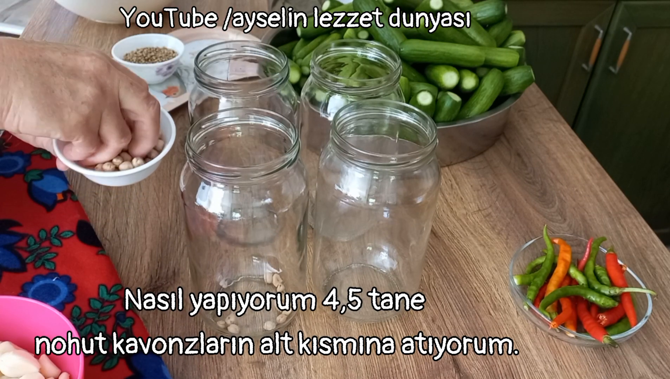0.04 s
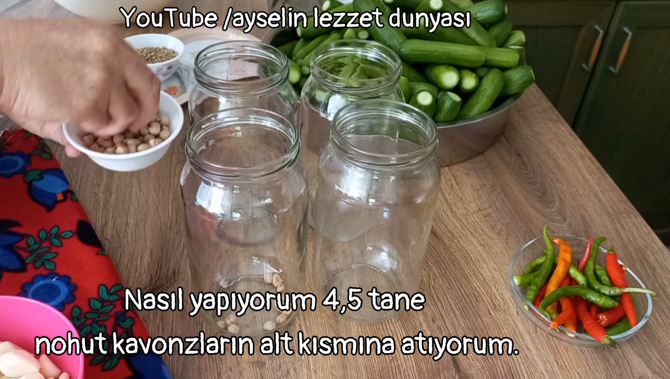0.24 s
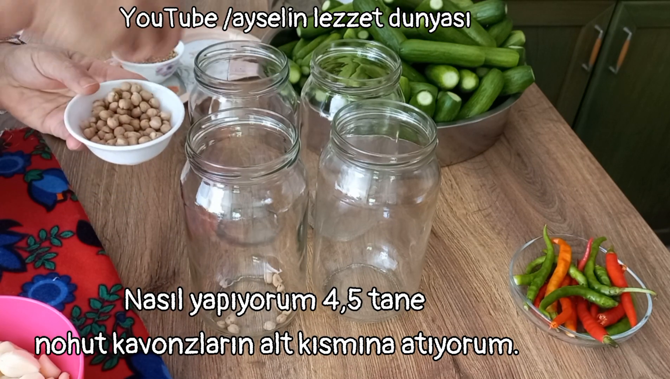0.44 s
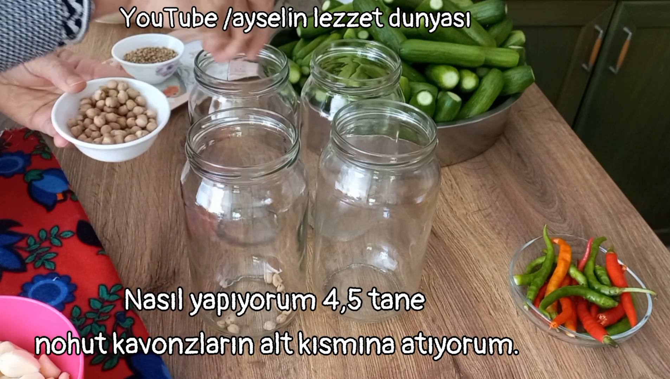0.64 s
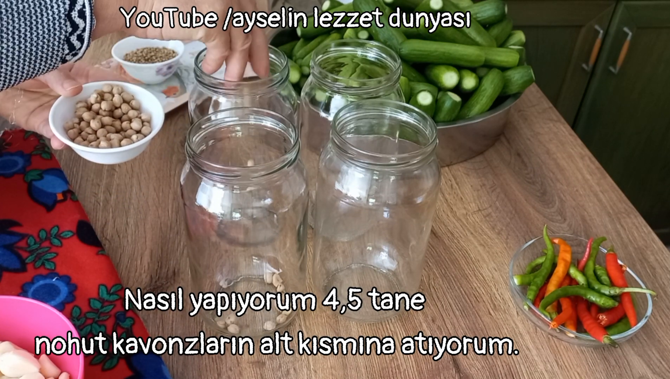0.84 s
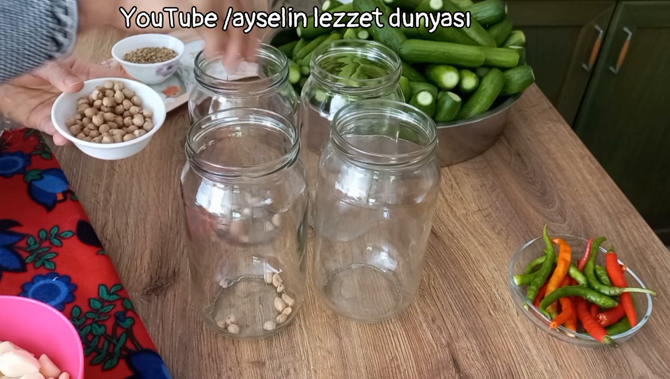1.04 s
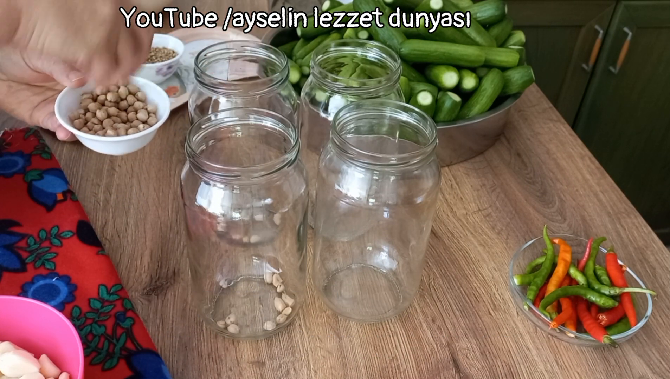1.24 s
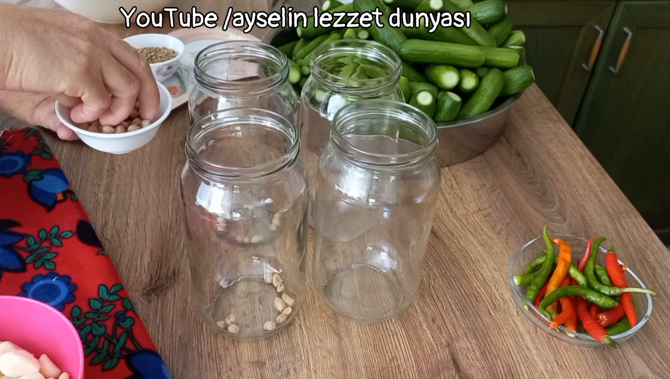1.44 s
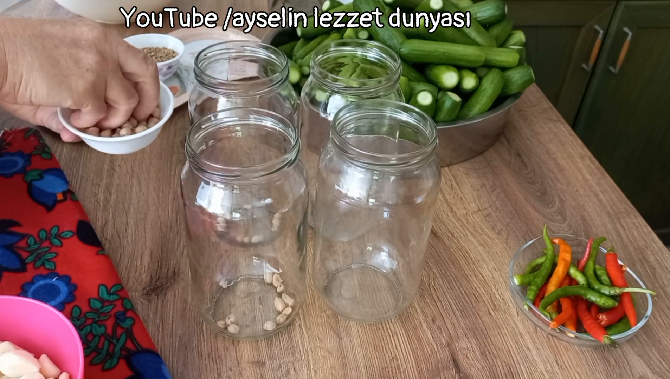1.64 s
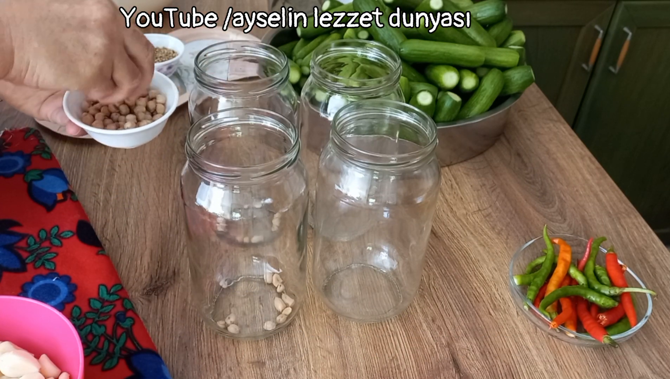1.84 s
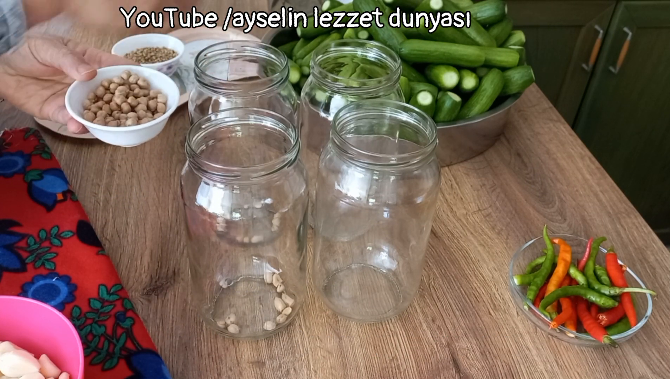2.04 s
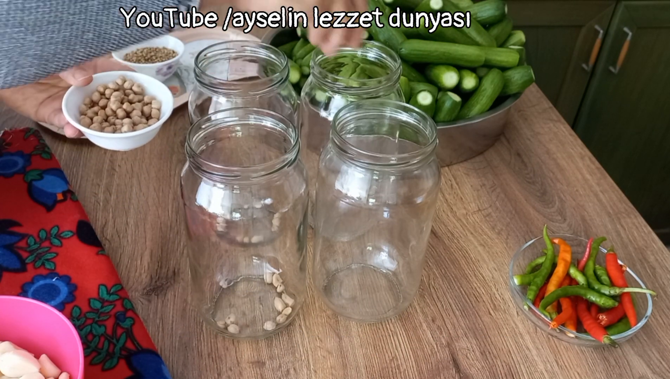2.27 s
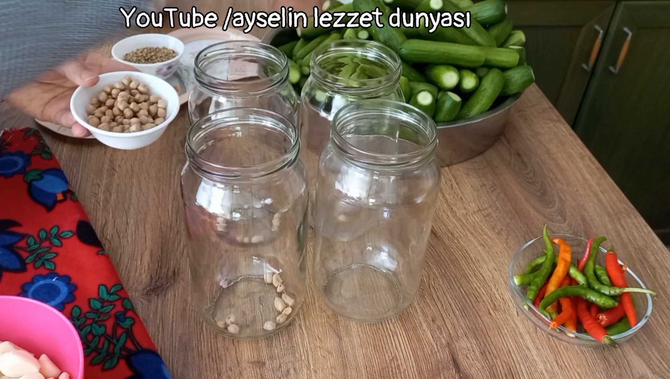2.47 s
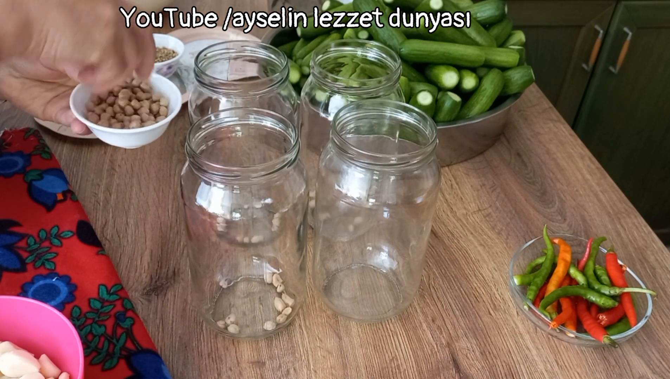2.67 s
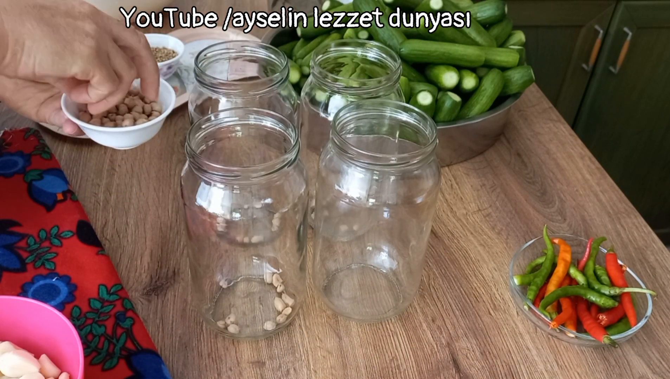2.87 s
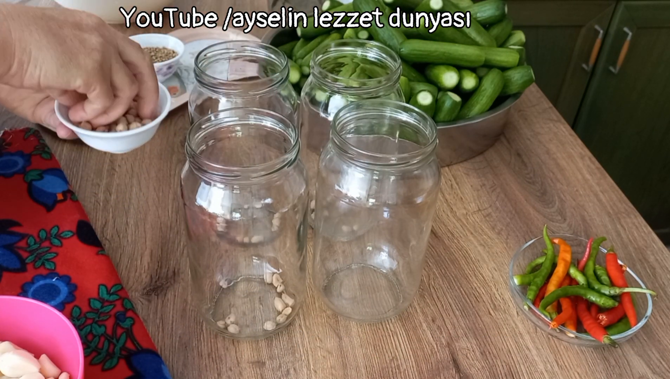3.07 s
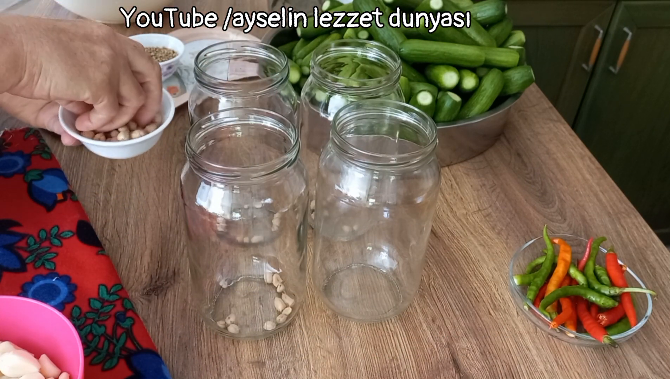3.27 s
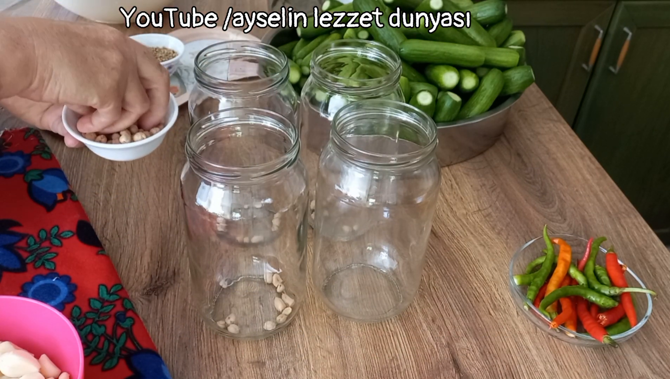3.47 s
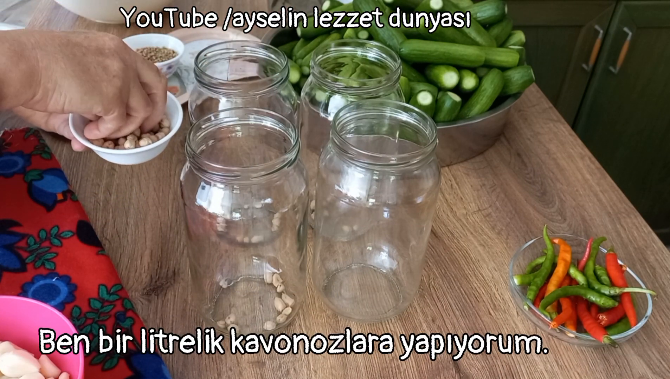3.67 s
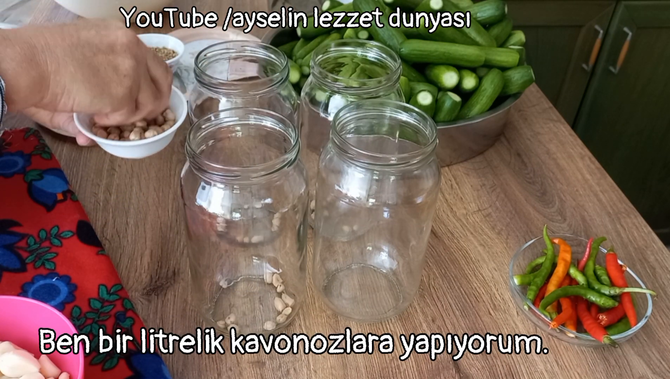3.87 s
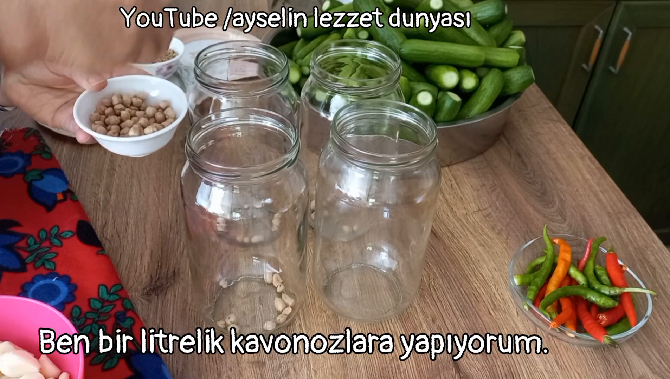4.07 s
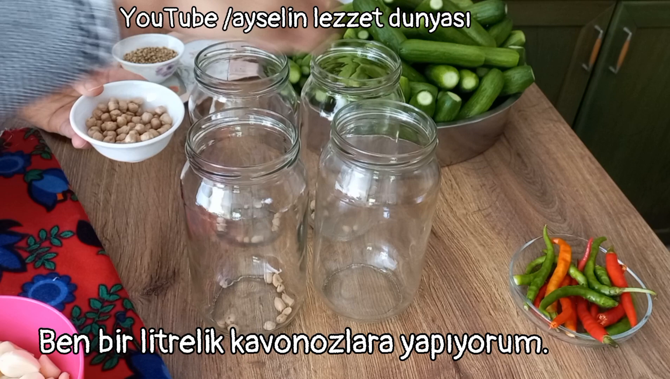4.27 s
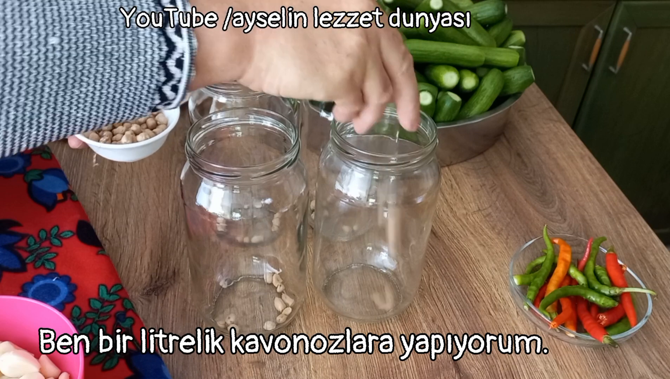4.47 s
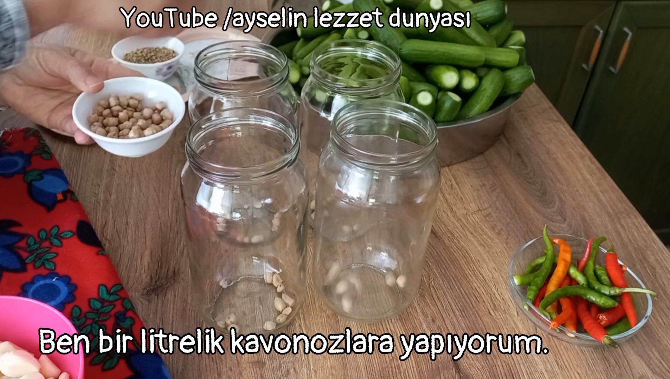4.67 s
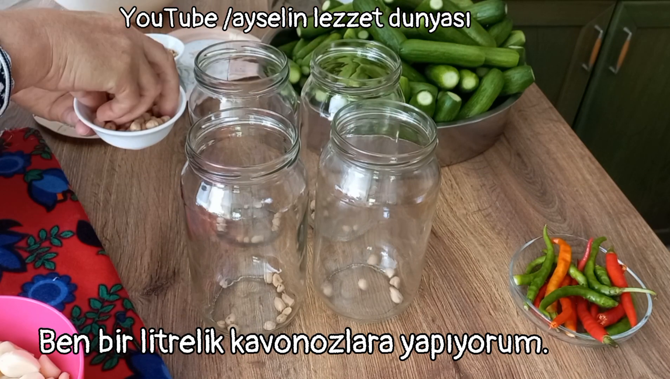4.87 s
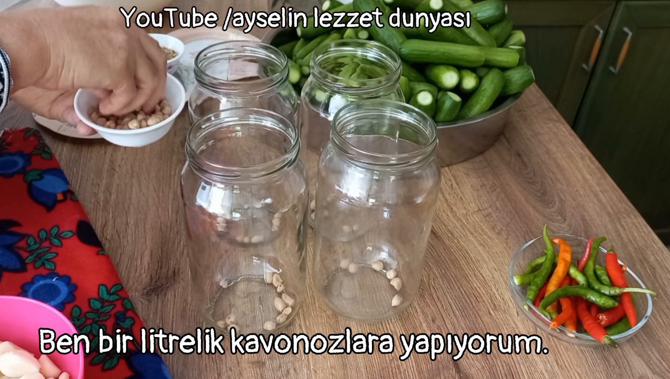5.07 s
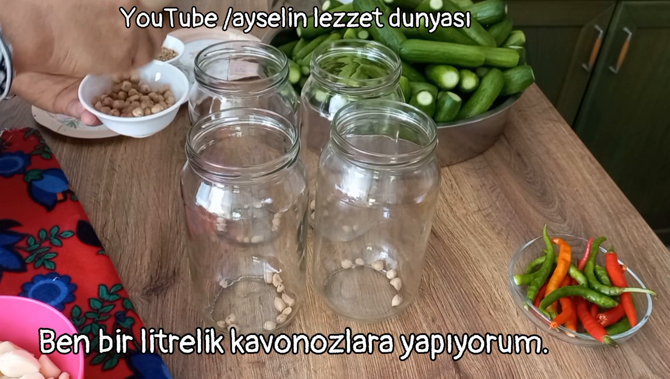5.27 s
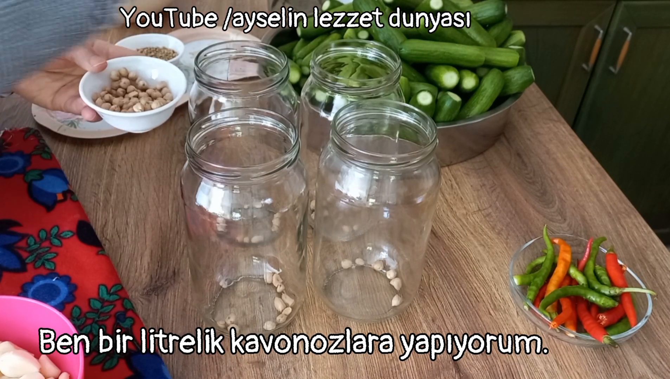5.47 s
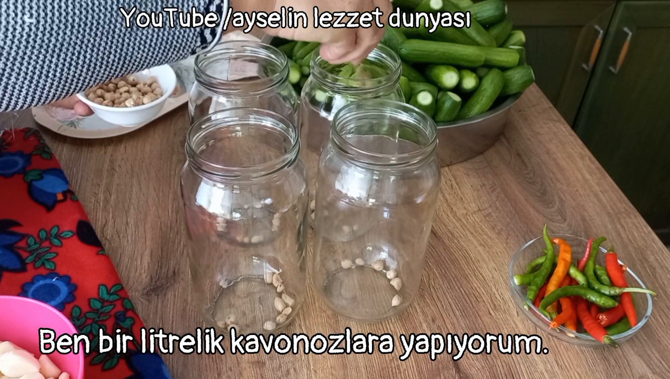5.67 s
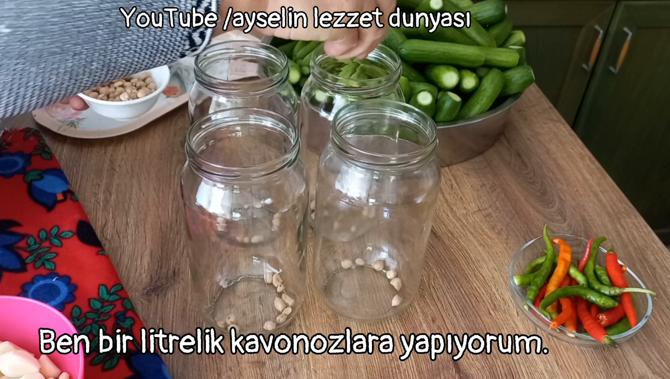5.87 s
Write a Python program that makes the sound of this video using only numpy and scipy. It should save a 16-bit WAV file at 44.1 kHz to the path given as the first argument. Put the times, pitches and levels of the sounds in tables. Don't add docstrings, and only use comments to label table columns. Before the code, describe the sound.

Close stereo microphones in a quiet kitchen. Fingers stir dried chickpeas in a damped porcelain bowl with short dry knocks, then drop them into empty glass jars: four quick bursts of bright, ringing clinks with a small hollow boom, each trailing into lighter bounces and rolling. Sparrows chirp outside the window with a slight wall echo. Low room and street hum and soft sleeve rustle lie underneath.

```python
import sys
import numpy as np
from scipy import signal
from scipy.io import wavfile

SR = 44100
rng = np.random.default_rng(int(sys.argv[2]) if len(sys.argv) > 2 else 0)


def nominal_scale(level):
    x = np.asarray(level, float) / 20
    return 10 ** x


def log_audio(samples):
    frames = np.atleast_2d(samples).T
    limited = np.clip(frames, -1, 1)
    pcm = np.round(limited * 32767).astype(np.int16)
    wavfile.write(sys.argv[1], SR, pcm)


N = 260631
T = np.arange(N) / SR


def rms_one(x):
    return x / np.sqrt(np.mean(x ** 2) + 1e-20)


def at_hz(points, hz):
    points_hz, values = np.transpose(points)
    return np.interp(np.log(hz), np.log(points_hz), values)


def band(x, low_hz, high_hz):
    edges_hz = [low_hz, min(high_hz, .45 * SR)]
    return signal.sosfilt(signal.butter(2, edges_hz, "band", fs=SR, output="sos"), x)


def clicks_at(times_s, sizes):
    line = np.zeros(N)
    line[np.round(np.asarray(times_s) * SR).astype(int)] = sizes
    return line


def grains(per_s, spread_db):
    sizes = nominal_scale(spread_db * np.minimum(rng.exponential(1, N), 4)) * rng.choice([-1, 1], N)
    return rms_one(sizes * (rng.random(N) < per_s / SR))


def wobble(t, per_s):
    knots_s = np.arange(t[0], t[-1] + 1 / per_s, 1 / per_s)
    return np.interp(t, knots_s, rng.standard_normal(len(knots_s)))


def dying(s, level_db, t60_s):
    power = signal.lfilter([1], [1, -nominal_scale(-120 / (t60_s * SR))], clicks_at(s, nominal_scale(2 * level_db)) + 1e-18)
    return np.sqrt(power)


def ring(clicks, hz, t60_s, rise_s=0.000089):
    turn, swell = np.exp(2j * np.pi * hz / SR), np.exp(-1 / (rise_s * SR))
    poles = np.poly([nominal_scale(-60 / (t60_s * SR)) * turn, swell * turn])
    left = rng.uniform(0, 2 * np.pi)
    apart = rng.uniform(-np.pi, np.pi) * min(hz / 1500, 1) ** 2
    mic_phase = np.exp(1j * np.array([[left], [left + apart]]))
    return (mic_phase * signal.lfilter([1 - swell], poles, clicks + 1e-18)).real


def clatter(s, level_db, t60_s, low_hz, high_hz):
    return dying(s, level_db, t60_s) * rms_one(band(rng.standard_normal((2, N)), low_hz, high_hz))


def echoes(x, t60_s, cut_hz):
    t = T[:SR]
    tail = rng.standard_normal((2, SR)) * nominal_scale(-60 * t / t60_s) * np.clip(t / 0.0046, 0, 1)
    tail = signal.lfilter(*signal.butter(1, [600, cut_hz], "band", fs=SR), tail)
    tail /= np.sqrt(np.sum(tail ** 2, axis=1, keepdims=True))
    return signal.fftconvolve(x, tail, axes=1)[:, :N]


def raking():
    # start/s, length/s, level/dB
    strokes = [(0.0, 0.013, -55), (0.14, 0.16, -53.5), (0.32, 0.18, -72.5), (1.658, 0.2, -51.5),
               (2.882, .17, -55), (3.384, 0.014, -64.5), (3.598, 0.094, -57), (3.875, 0.06, -53.5),
               (4.06, .02, -58.5), (4.581, 0.039, -47.5), (4.953, 0.14, -48.5), (5.168, 0.21, -56.5)]
    rise_db_per_s, fall_db_per_s = 315, 205
    gain = 0
    for s, length_s, db in strokes:
        early_s, late_s = np.maximum(s - T, 0), np.maximum(T - s - length_s, 0)
        gain = gain + nominal_scale(db - rise_db_per_s * early_s - fall_db_per_s * late_s)
    return gain


def bowl():
    # t/s, level/dB, colour/dB (bright over dull)
    knocks = [(0.0556, -47.5, 0), (0.1072, -58, -17), (0.129, -46, -19), (0.1815, -40, -14.5),
              (0.1885, -46, -6), (0.2407, -36, -12), (0.2924, -43, -8), (0.4269, -39, -18),
              (1.6894, -35, -25), (1.634, -51, -10), (1.806, -40, -12), (1.8335, -44, -8),
              (1.8925, -46, -13.5), (3.1618, -44.5, -7), (3.2236, -50, -5), (3.3104, -63, -4),
              (3.3205, -51, -39.5), (3.3792, -39, -35), (3.4022, -40.5, -5), (3.4476, -57, -17),
              (3.5376, -48.5, -8), (3.5654, -48.5, -14), (3.603, -45, -6), (3.6541, -45, -17),
              (3.7188, -44.5, -29), (3.7395, -48, -10), (3.7487, -39.5, -37), (3.7665, -47, -5),
              (3.7844, -29.5, -16), (3.812, -49, -2), (3.8412, -44, -21), (3.907, -32, -12),
              (3.921, -39, -27), (3.9853, -46.5, -18)]
    # f/Hz, width/Hz, level/dB
    bowl_modes = [(4910, 65, 2), (5220, 90, -7), (5520, 110, -9), (6130, 220, -14), (7620, 170, -16),
                  (8450, 90, -12), (10200, 250, -20), (12600, 90, -11), (13100, 150, -15)]
    mode_spread_db = 3
    s, level_db, colour_db = np.transpose(knocks)
    rake, out = grains(per_s=1000, spread_db=0.5) * raking(), 0
    for hz, width_hz, mode_db in bowl_modes:
        uneven_db = rng.normal(0, mode_spread_db, len(s))
        blow = nominal_scale(level_db - 2 + (colour_db + 10) * (hz > 9000) + uneven_db)
        out = out + nominal_scale(mode_db) * ring(clicks_at(s, blow) + nominal_scale(-27) * rake, hz, 2.4 / width_hz)
    crack_db = level_db + colour_db / 2 - 14
    clicks = clicks_at(s, nominal_scale(crack_db))
    crack = band(clicks, 4500, 6700) + band(clicks, 6500, 15000)
    jostle = clatter(s, crack_db, 0.11, 3100, 9100)
    patter = grains(per_s=1000, spread_db=3) * raking()
    return out + crack + jostle + nominal_scale(1.5) * band(np.array([rake, patter]), 1530, 8600)


def fall(start_s, length_s, top_hz, end_hz, db):
    # share of length/1, share of way from end to top pitch/1, level/dB
    fall_shape = [
        (0, .68, -9.5),
        (.14, 0.91, -0.5),
        (.3, 0.93, -1),
        (0.451, 0.3, 4.5),
        (0.649, 0.18, -6.5),
        (.85, .12, -2),
        (1.002, 0, -16),
    ]
    return [(start_s + u * length_s, end_hz + way * (top_hz - end_hz), db + shape_db)
            for u, way, shape_db in fall_shape]


def double(start_s, length_s, top_hz, db, swell_db):
    # share of length/1, share of top pitch/1, level/dB
    double_shape = [
        (0, 0.93, -10),
        (.2, 0.94, 2.5),
        (.3, 0.81, 0),
        (0.501, .63, -15),
        (0.601, .66, 0),
        (0.799, .73, -1),
        (.88, 0.57, -11),
        (1, 0.557, -10),
    ]
    return [(start_s + u * length_s, share * top_hz, db + shape_db + swell_db * u)
            for u, share, shape_db in double_shape]


def note(rows, warble_hz, flutter, ragged_db):
    s, hz, level_db = np.transpose(rows)
    sounding = slice(max(int(s[0] * SR), 0), int(s[-1] * SR))
    t = T[sounding]
    beat = np.cumsum(2 * np.pi * 210 / SR * nominal_scale(2.5 * wobble(t, 200)))
    pitch_hz = np.interp(t, s, hz) + warble_hz * (np.sin(beat) + .6 * wobble(t, 120))
    phase = np.cumsum(2 * np.pi / SR * pitch_hz)
    fade = np.clip(np.minimum(t - s[0] + 1e-3, s[-1] - t) / .006, 0, 1)
    tone = np.sin(phase) * (1 + flutter * np.cos(beat)) * nominal_scale(ragged_db * wobble(t, 92.7))
    out = np.zeros(N)
    out[sounding] = np.sqrt(2) * nominal_scale(np.interp(t, s, level_db)) * fade * tone
    return out


def sparrows():
    # start/s, length/s, top f/Hz, end f/Hz, level/dB
    rough_falls = [(0.297, 0.17, 4440, 2815, -55.5), (1.68, 0.14, 5900, 3300, -46),
                   (2.312, 0.13, 4640, 2800, -56.5), (2.954, .125, 4420, 2804, -43.5),
                   (2.988, .08, 2940, 2400, -52), (4.37, 0.038, 4627, 3300, -66),
                   (5.262, 0.039, 6060, 5000, -41.5), (4.572, 0.036, 6200, 5000, -48),
                   (4.622, .035, 2950, 2450, -46), (5.693, .045, 4300, 3700, -62.5),
                   (5.272, 0.1, 5040, 2680, -39), (4.552, 0.071, 4320, 3500, -46.5)]
    clear_falls = [
        (3.12, 0.059, 2300, 2183, -63),
        (3.185, 0.15, 2670, 2506, -62),
        (4.418, 0.066, 4120, 2947, -61),
        (4.594, 0.038, 3029, 2890, -34),
        (5.739, 0.04, 3200, 3100, -60),
    ]
    # start/s, length/s, top f/Hz, level/dB, swell from start to end/dB
    rough_doubles = [
        (-.055, 0.096, 4370, -41.5, 1),
    ]
    clear_doubles = [
        (.172, 0.1, 4634, -51, 8),
        (3.609, .11, 4530, -58.5, 6),
        (3.872, 0.12, 4654, -46, -4.5),
    ]
    rough = [fall(*r) for r in rough_falls] + [double(*r) for r in rough_doubles]
    calls = sum(note(r, warble_hz=230, flutter=.7, ragged_db=5.5) for r in rough)
    calls += sum(note(fall(*r), warble_hz=25, flutter=.2, ragged_db=2.5) for r in clear_falls)
    calls += sum(note(double(*r), warble_hz=70, flutter=.35, ragged_db=6) for r in clear_doubles)
    near = np.array([calls * nominal_scale(1.5), np.roll(calls, 2) * nominal_scale(-1.5)])
    wall = np.pad(near[::-1], ((0, 0), (round(.024 * SR), 0)))[:, :N]
    return near + nominal_scale(-8) * wall + nominal_scale(-6) * echoes(near, 0.48, 9000)


def hum():
    # f/Hz, level/dB
    hum_spectrum = [(12, -34), (20, -0.5), (75, 1.5), (124, 1.5), (200, -1.5), (289, -14), (361, -3),
                    (492, -5), (816, -7), (1430, -31), (1560, -25.5), (2120, -26), (4050, -22.5),
                    (14300, -50.5), (16500, -55)]
    # f/Hz, correlation/1
    likeness = [(60, .65), (180, .8), (400, .85), (700, .42), (1650, .1), (15000, 0)]
    hum_db = -58
    out, edges_hz = 0, 20 * 2 ** np.arange(0, 10, .5)
    white = rng.standard_normal((2, 2, N))
    for k, (low_hz, high_hz) in enumerate(zip(edges_hz, edges_hz[1:])):
        centre_hz = np.sqrt(low_hz * high_hz)
        mid, side = band(white[k % 2], low_hz, high_hz)
        alike = np.clip(at_hz(likeness, centre_hz), -1, 1)
        knots_s = T[::6000]
        flicker_db = 1.1 * np.interp(T, knots_s, rng.standard_normal(len(knots_s)))
        gain = nominal_scale(at_hz(hum_spectrum, centre_hz) + flicker_db)
        out = out + gain * (np.sqrt(1 + alike) * mid + np.sqrt(1 - alike) * side * [[1], [-1]])
    return nominal_scale(hum_db) * rms_one(out)


def cloth():
    # t/s, level/dB
    sleeve = [
        (0.0, -65.5),
        (0.84, -62.5),
        (0.99, -61.5),
        (5.91, -68),
    ]
    s, db = np.transpose(sleeve)
    rustle = rms_one(band(rng.standard_normal((2, N)), 540, 2600))
    return rustle * np.interp(T, s, nominal_scale(db), 0, 0) * nominal_scale(-0.5)


def strikes(landings, bounces, bounce_base_db):
    s, bright, base, wall, shoulder = np.transpose(landings)
    boom = -37 + 0.5 * bright + 0.19 * base - 0.23 * np.maximum(wall, shoulder)
    landing_rows = [s, bright, base, wall, shoulder, boom]
    when, db = np.transpose(bounces)
    bounce_rows = [when, db, db + bounce_base_db, db - 25, db - 27, -28 + 0.66 * db]
    rows = np.hstack([landing_rows, bounce_rows]).T
    return rows[np.argsort(rows[:, 0])]


def jar(drops, modes, t60_s, wall_t60_s, roll_db):
    part_edges_hz = [4700, 6400, 8300]
    clatter_t60_s, air_hz, air_t60_s = .12, 390, .13
    s, bright, base, wall, shoulder, boom = np.transpose(drops)
    rolling = grains(per_s=300, spread_db=5) * dying(s, bright + roll_db, 0.43)
    pitches_hz, levels_db = np.transpose(modes)
    parts, out = np.searchsorted(part_edges_hz, pitches_hz), 0
    for hz, level_db, part in zip(pitches_hz, levels_db, parts):
        weak_db = level_db - levels_db[parts == part].max()
        blow_db = (wall - 3, base - 1, shoulder - 3, bright - 10)[part] + weak_db
        spread_db = (3.5, 2, 3, 4.5)[part]
        split_hz = rng.uniform(20, 45)
        for side, twin_db in ((-.3, 0), (.7, -5)):
            luck = nominal_scale(rng.normal(twin_db, spread_db, len(s))) * rng.choice([-1, 1], len(s))
            skitter = nominal_scale(level_db - levels_db.max()) * rolling * rng.choice([-1, 0, 1], N)
            lasts_s = (t60_s if part % 2 else wall_t60_s) * rng.uniform(.8, 1.2)
            lasts_s *= nominal_scale(weak_db / 5 * (part > 0))
            clicks = clicks_at(s, nominal_scale(blow_db) * luck) + skitter
            out = out + ring(clicks, hz + side * split_hz, lasts_s, rise_s=0.0014)
    out = out + clatter(s, bright - 14, clatter_t60_s, 5600, 18000)
    out = out + clatter(s, np.maximum(wall, shoulder) - 15, clatter_t60_s, 4800, 5800)
    out = out + clatter(s, wall - 15, clatter_t60_s, 4200, 4700)
    table = clatter(s, boom - 9, 0.37, 370, 1800) + clatter(s, boom - 7, 0.12, 200, 470)
    crack = band(clicks_at(s, nominal_scale(bright - 15.5)), 4500, 18000)
    air = ring(clicks_at(s, nominal_scale(boom - 0.5)), air_hz, air_t60_s, rise_s=0.0012)
    return out + air + crack + table.mean(axis=0)


def jars():
    # f/Hz, level/dB
    modes_a = [(1900, -76), (2288, -71), (2659, -73), (3391, -51), (4005, -56), (5281, -58), (5518, -39),
               (6185, -63), (7316, -49), (7817, -53), (8161, -61), (8694, -58), (9652, -42), (9916, -43),
               (10250, -47), (11073, -54), (11596, -57), (11832, -57), (11994, -56), (12290, -52),
               (12392, -52), (12904, -50), (13517, -51), (14298, -61), (14589, -51), (14896, -55),
               (15278, -55), (15493, -56)]
    modes_b = [(2067, -70), (3338, -48), (4199, -47), (5087, -62), (5825, -45), (6541, -60), (7472, -43),
               (7983, -52), (8489, -73), (8705, -66), (9518, -54), (9857, -45), (9932, -47), (10072, -50),
               (10750, -55), (11213, -54), (11660, -60), (11940, -57), (12064, -59), (12355, -56),
               (12409, -55), (12581, -55), (12941, -62), (13372, -54), (14271, -59), (14551, -56),
               (14853, -54), (15165, -54)]
    modes_c = [(2056, -76), (3004, -80), (3440, -56), (4156, -57), (4883, -62), (5233, -57), (6051, -42),
               (6126, -51), (7709, -64), (8053, -62), (8683, -59), (9254, -64), (9588, -61), (9717, -62),
               (9868, -57), (10228, -49), (10557, -54), (11811, -55), (12290, -47), (12586, -59),
               (12915, -59), (13555, -61), (13954, -65), (14293, -58), (14583, -65), (14707, -64),
               (15278, -52), (15423, -61)]
    # t/s, bright ring/dB, base ring/dB, wall ring/dB, shoulder ring/dB
    landings_a = [(0.8983, -17, -23, -50.5, -40), (0.9271, -15, -19, -40, -43),
                  (0.9685, -14.5, -28.5, -41, -46.5), (0.9744, -21, -24.5, -44.5, -46),
                  (1.0027, -26, -38.5, -31.5, -45), (1.0175, -31.5, -31, -25, -21),
                  (1.0405, -17.5, -30.5, -27.5, -24.5), (1.059, -11.5, -17, -27.5, -27.5),
                  (1.1083, -18.5, -20.5, -34.5, -25.5), (1.1458, -22.5, -19, -51.5, -30),
                  (1.1522, -14, -14.5, -46, -36), (1.1931, -25, -34, -42.5, -35.5),
                  (4.0494, -59, -51, -37, -77)]
    landings_b = [(2.4858, -17.5, -39.5, -62, -54), (2.4936, -14.5, -32, -57, -54),
                  (2.5057, -21.5, -20, -46, -49), (2.5403, -11.5, -23.5, -49, -50),
                  (2.5465, -38, -54, -50, -44), (2.5514, -30, -47, -49, -40),
                  (2.5682, -21, -25, -27.5, -47), (2.6, -18, -34, -23.5, -17),
                  (2.6132, -22, -34, -23.5, -22), (2.6378, -22.5, -24.5, -39.5, -38),
                  (5.8545, -20, -27, -49.5, -41), (5.8634, -28, -27, -66, -64),
                  (5.8807, -19.5, -31, -60, -56), (5.8904, -23, -29, -42, -54)]
    landings_c = [(4.6089, -23.5, -65, -33, -52), (4.6164, -30, -40, -39, -52),
                  (4.6456, -12.5, -31, -47, -50), (4.6428, -11.5, -48, -56, -51),
                  (4.6832, -23.5, -32, -28.5, -31), (4.7028, -64, -65, -40, -34),
                  (4.7292, -36, -55, -48, -54), (4.7624, -47, -64, -33.5, -34),
                  (4.7895, -19.5, -67, -46, -53), (4.8028, -35, -27, -66, -48),
                  (4.856, -27.5, -33.5, -42.5, -47)]
    # t/s, level/dB
    bounces_a = [(1.2263, -29), (1.2515, -27), (1.2835, -29.5), (1.3084, -29), (1.3445, -31), (1.3797, -35),
                 (1.4242, -30.5), (1.4628, -36), (1.5161, -40.5), (1.5382, -38)]
    bounces_b = [
        (2.69, -25.5),
        (2.7351, -27.5),
        (2.7709, -31),
        (2.8035, -34.5),
        (2.8707, -46),
        (2.9066, -42),
    ]
    bounces_c = [
        (4.8779, -29.5),
        (4.913, -29),
        (4.9474, -33),
        (4.979, -47),
        (5.012, -33.5),
        (5.0586, -36),
        (5.1662, -62),
        (5.2028, -42),
    ]
    pan = nominal_scale(np.array([[1.2], [-1.2]]))
    glass = jar(strikes(landings_a, bounces_a, bounce_base_db=-2.5), modes_a, 0.14, 0.13, -45.5) * pan
    glass += jar(strikes(landings_b, bounces_b, bounce_base_db=-6.5), modes_b, 0.16, 0.11, -51)
    glass += jar(strikes(landings_c, bounces_c, bounce_base_db=-10.5), modes_c, 0.28, 0.11, -44)
    return glass


def sway():
    # t/s, f/Hz, level/dB, t60/s, beat f/Hz
    sways = [
        (0.915, 1886, -46.5, 2.2, 10.7),
        (2.488, 2100, -51, 0.38, 11.3),
        (2.598, 2053, -33.5, 0.34, 10.7),
        (4.046, 1907, -40.5, .2, 14.3),
        (4.69, 2056, -37.5, 0.76, 3.2),
        (5.87, 2067, -48.5, 0.43, 13),
    ]
    out = 0
    for s, hz, db, t60_s, beat_hz in sways:
        beat = np.sin(np.pi * beat_hz * (T - s) + .3)
        out = out + ring(clicks_at([s], nominal_scale(db)), hz, t60_s, rise_s=0.0034) * beat
    return out


def scene():
    table = jars() + bowl()
    room = nominal_scale(-9) * echoes(table, 0.22, 4950)
    return table + room + sparrows() + hum() + cloth() + sway()


def low_pass(x):
    return signal.sosfilt(signal.butter(12, 16830, fs=SR, output="sos"), x)


def record(dry):
    hiss_db, cutoff_hz = -87, 15900
    hiss = nominal_scale(hiss_db) * rms_one(band(rng.standard_normal(dry.shape), 10000, 19000))
    mix = signal.sosfilt(signal.cheby2(14, 45, cutoff_hz, fs=SR, output="sos"), dry + hiss)
    return low_pass(mix)


dry = scene()
out = record(dry)
log_audio(out)
```